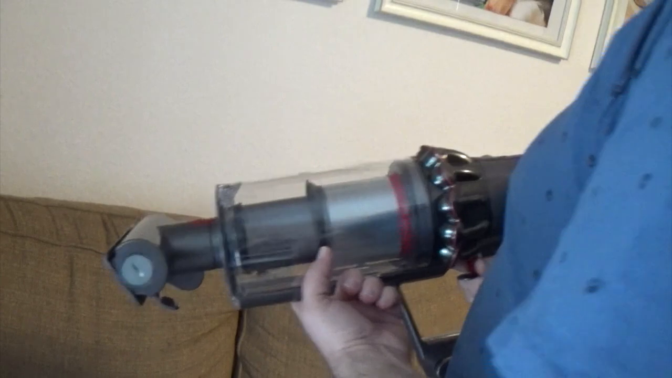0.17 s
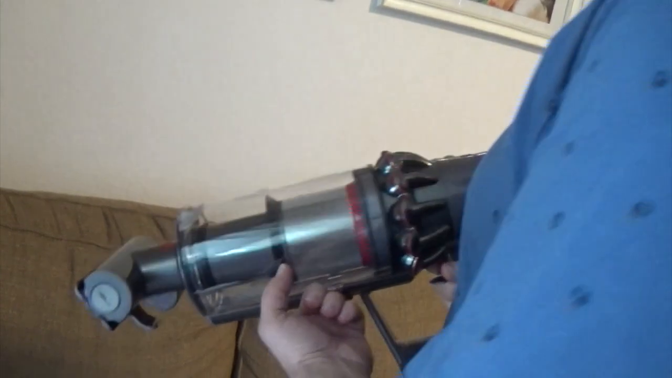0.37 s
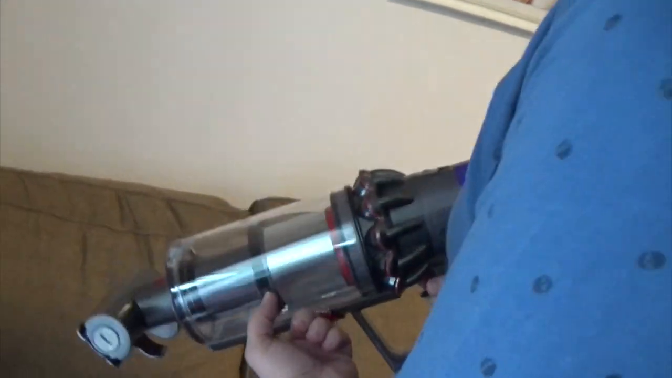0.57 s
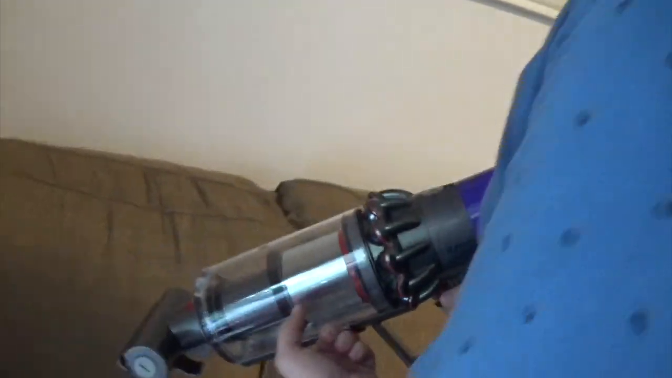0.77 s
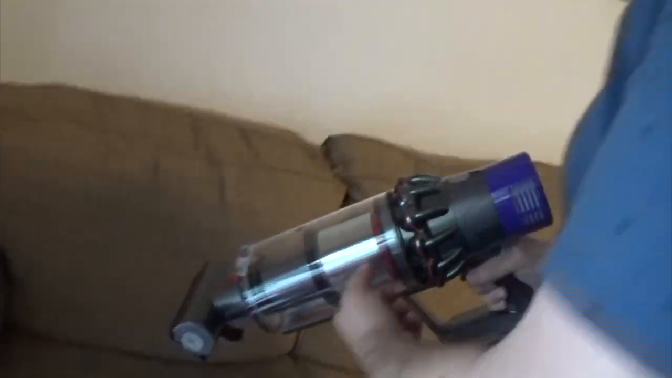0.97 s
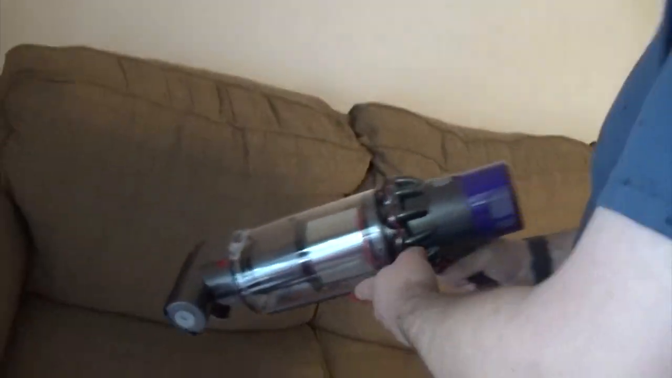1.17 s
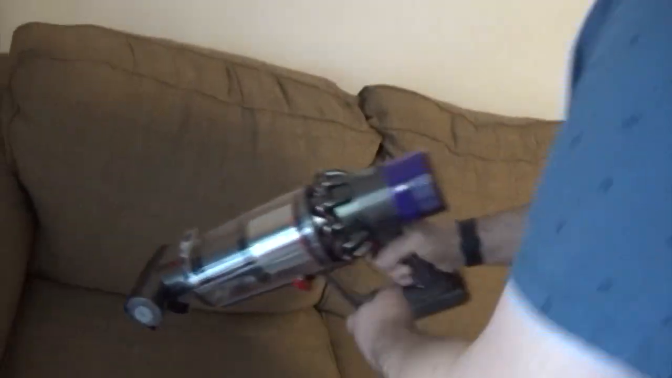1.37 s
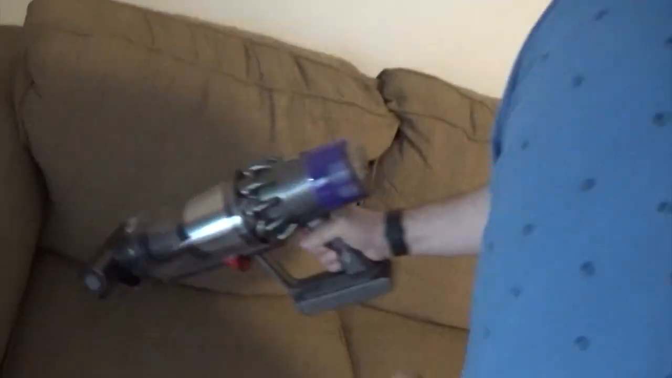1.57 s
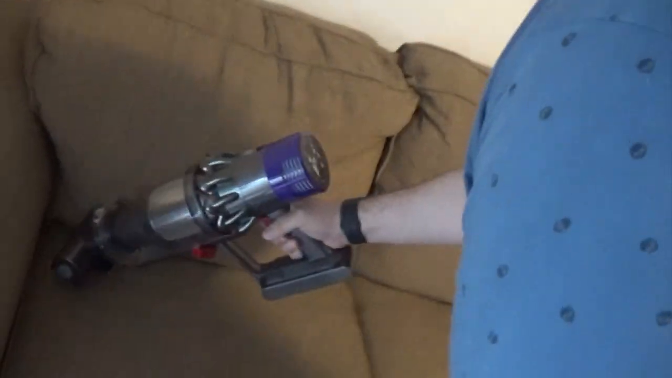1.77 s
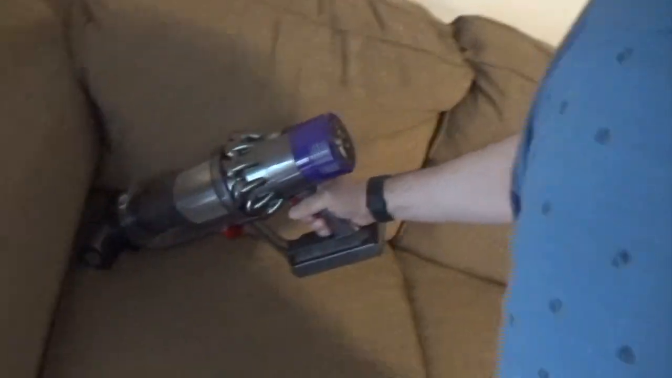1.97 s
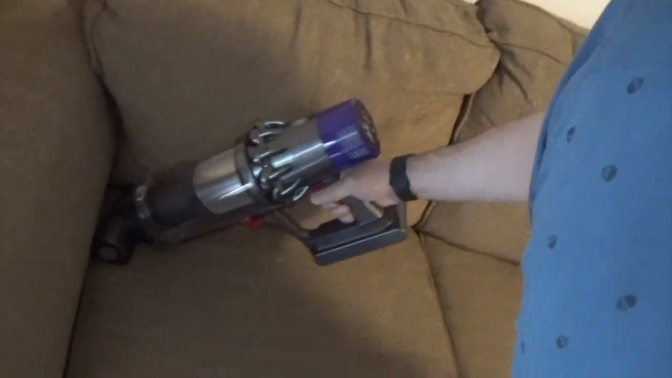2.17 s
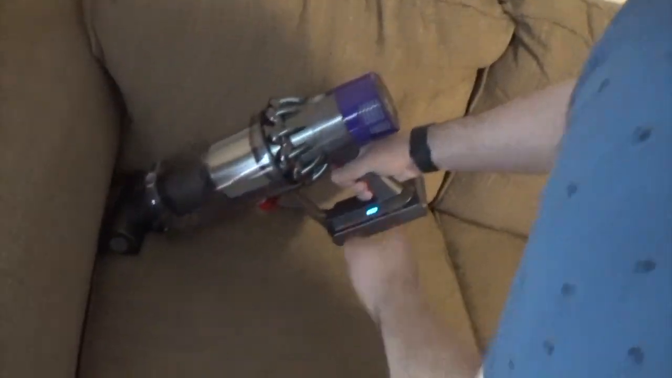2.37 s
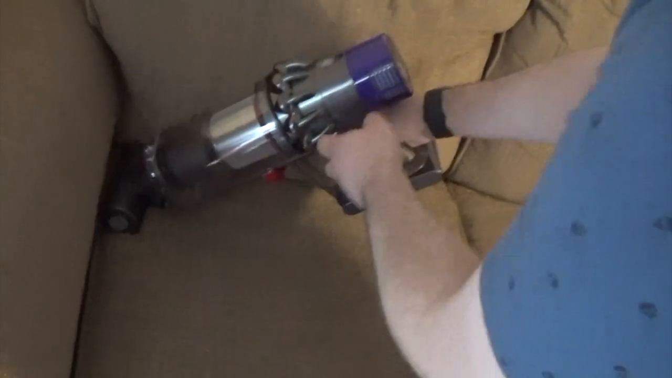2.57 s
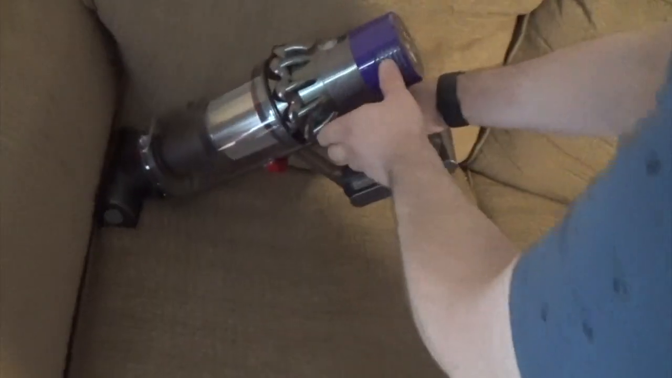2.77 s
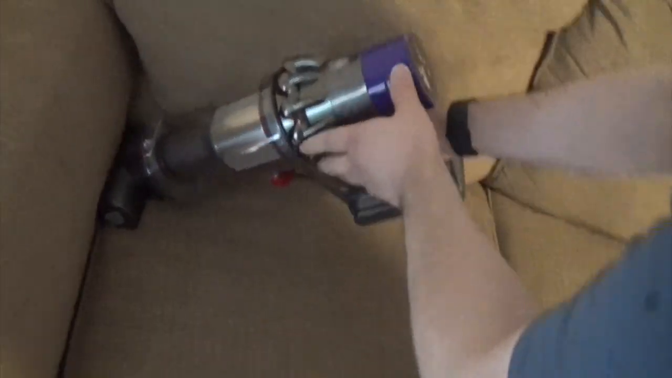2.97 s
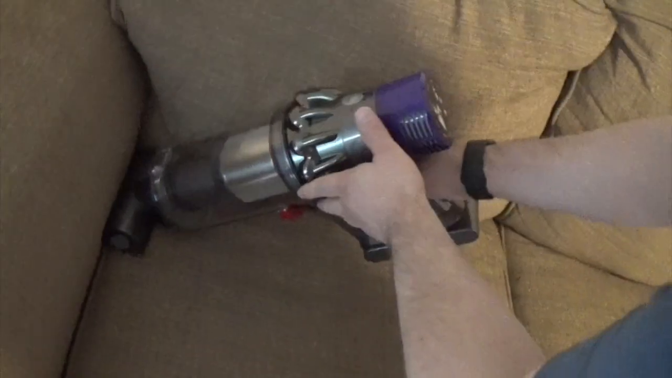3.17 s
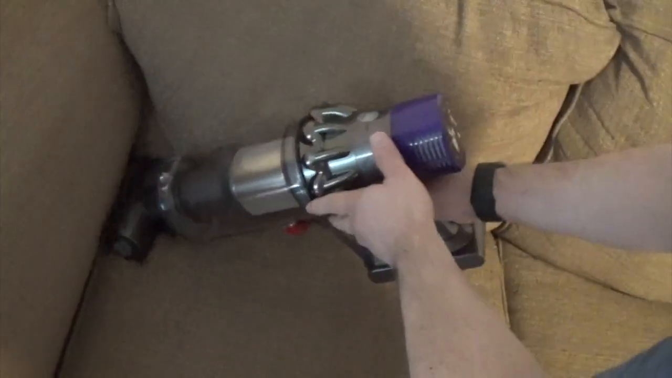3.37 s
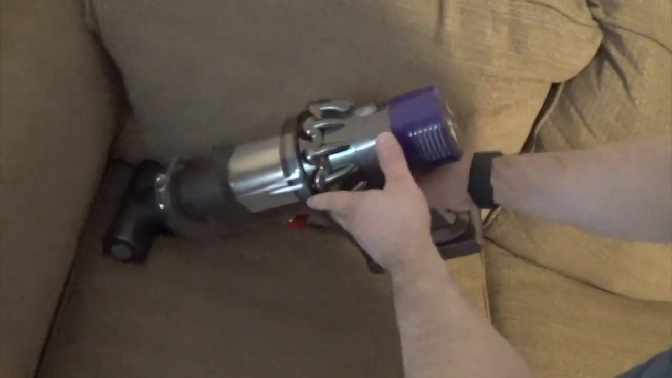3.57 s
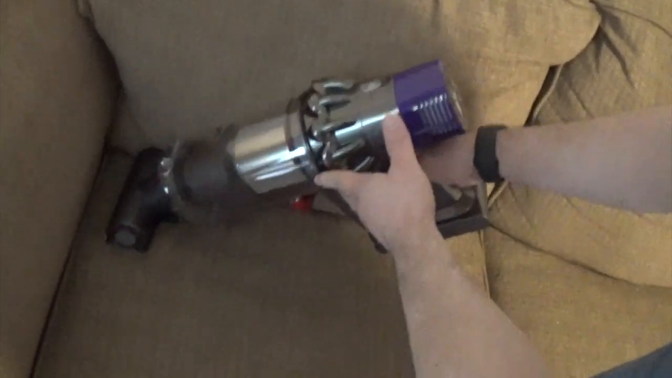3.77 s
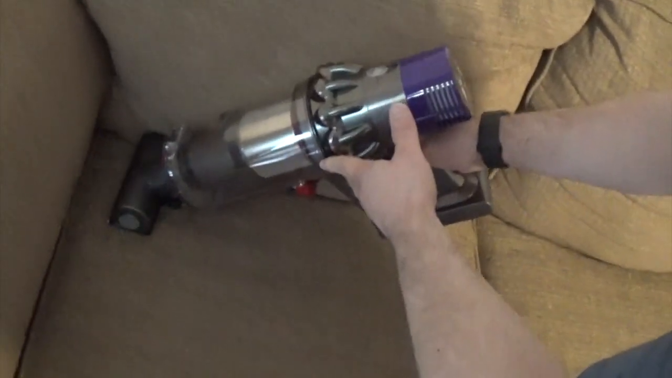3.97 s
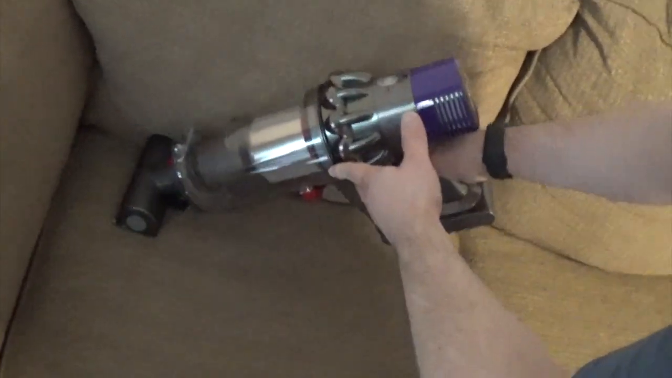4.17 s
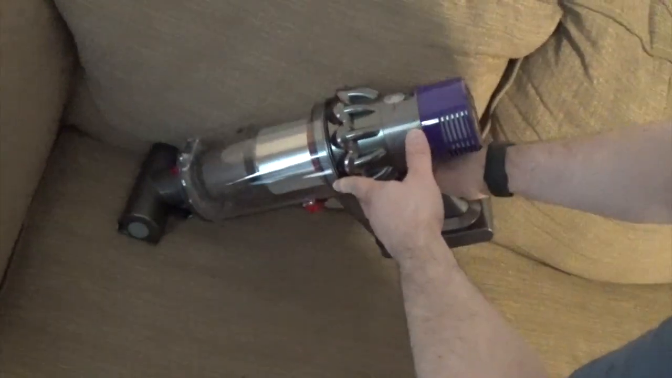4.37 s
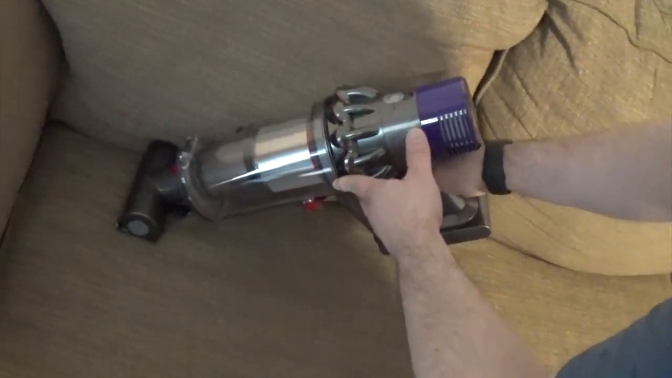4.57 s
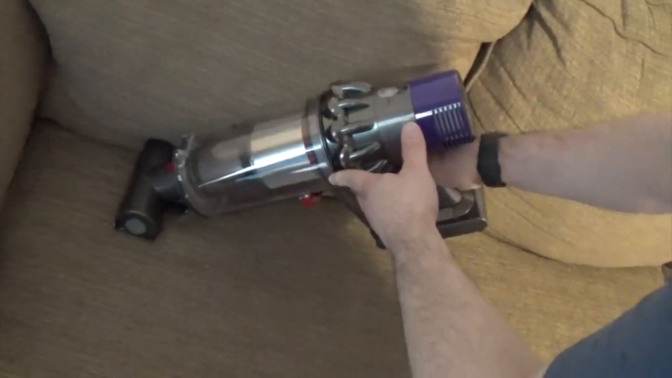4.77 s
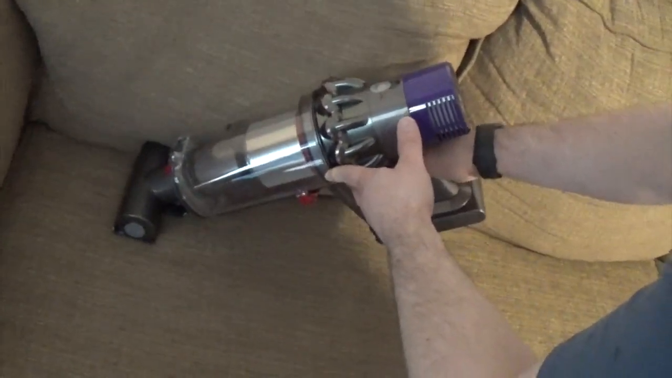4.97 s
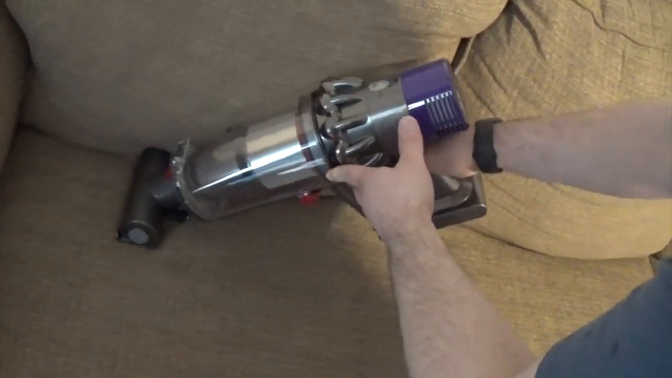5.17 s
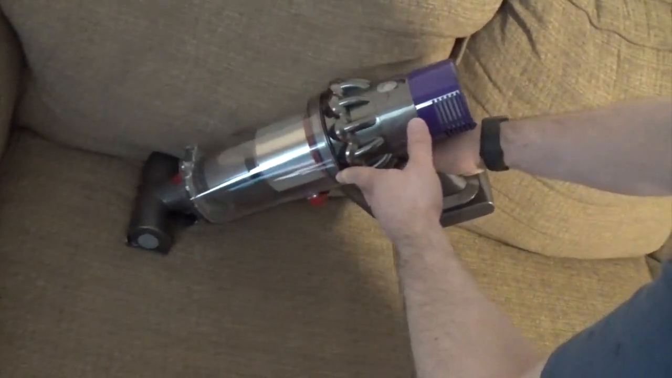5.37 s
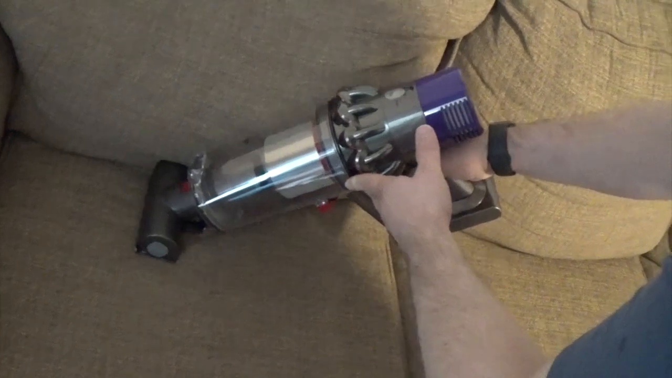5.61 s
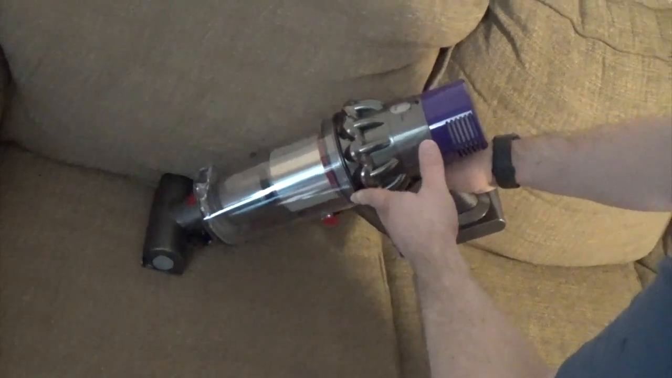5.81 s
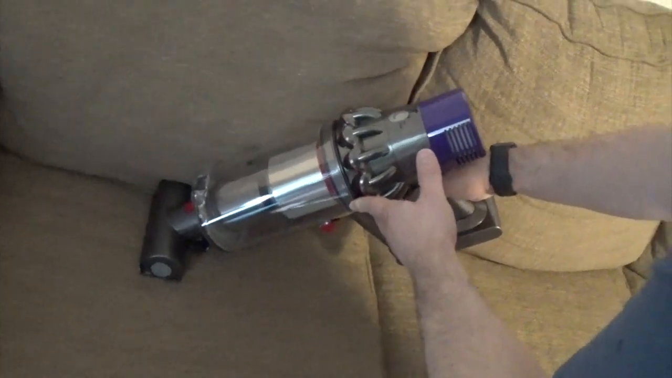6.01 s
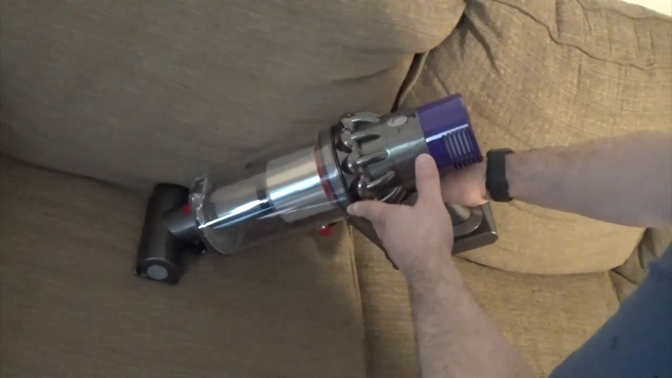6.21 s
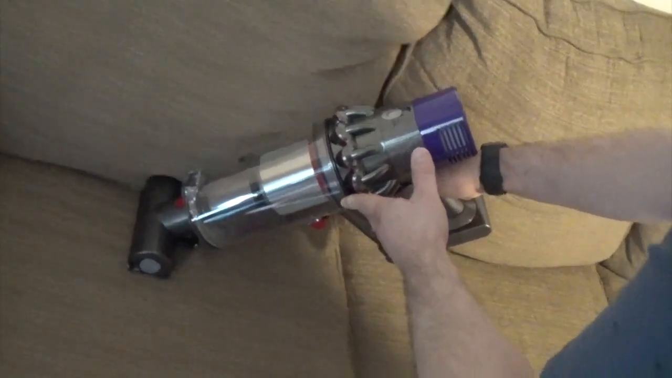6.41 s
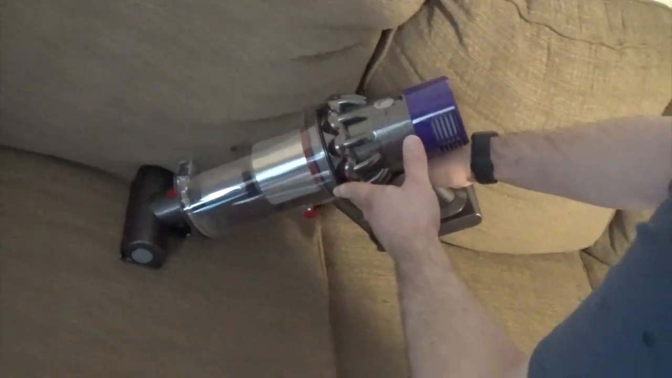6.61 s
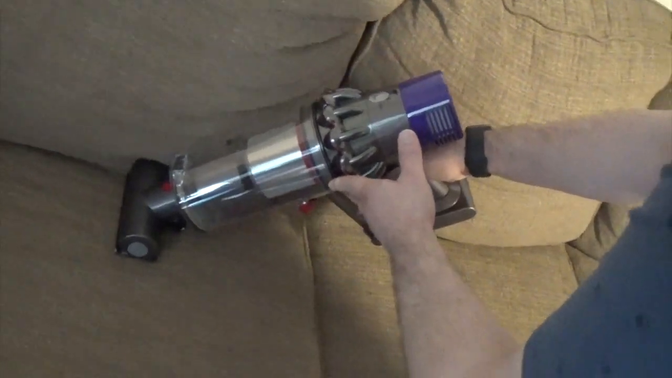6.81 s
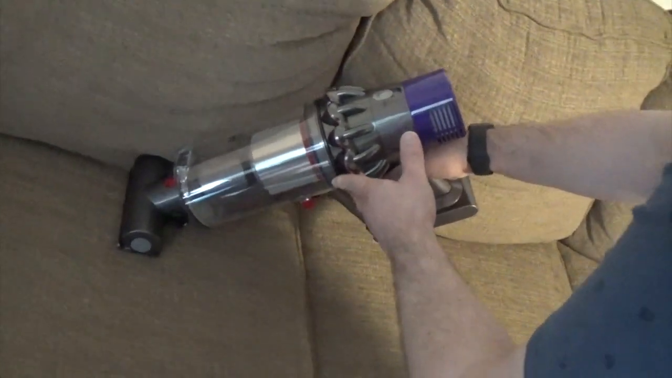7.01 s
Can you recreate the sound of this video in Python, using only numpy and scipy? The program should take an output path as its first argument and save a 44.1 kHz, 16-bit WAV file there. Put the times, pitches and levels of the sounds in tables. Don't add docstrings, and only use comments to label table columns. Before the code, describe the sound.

Quiet handling clicks, a brief motor chirp coasting down to silence, then a handheld vacuum starts abruptly and runs loudly with rushing air and high whine.

```python
import sys
import numpy as np
from scipy import signal
from scipy.fft import rfft, irfft, next_fast_len
from scipy.io import wavfile
from scipy.ndimage import uniform_filter1d, map_coordinates

SR = 44100
rng = np.random.default_rng(int(sys.argv[2]) if len(sys.argv) > 2 else 0)


def put_to_file(sound):
    columns = np.atleast_2d(sound).T
    safe = np.clip(columns, -1, 1)
    whole_steps = np.round(safe * 32767)
    wavfile.write(sys.argv[1], SR, whole_steps.astype(np.int16))


def decibels_to_gain(level_db):
    exponent = np.asarray(level_db, float) / 20
    return 10 ** exponent


N = 310905

# [f/Hz, width/Hz, level/dB]
CASING = [(290.4, 33, -13.5), (446.6, 47, -6), (618, 43, -7.5), (690, 24, -4), (840, 47, 2),
          (1010, 30, -27), (1097.5, 45, 14), (1190, 20, 4), (1305, 40, 7), (1476, 44.5, -1.5),
          (1750, 120, -9), (2035, 57, 0), (2215, 68, 2), (2310, 51, -2), (2420, 53, 4.5), (2700, 39, -20),
          (3024, 60, -6), (3355, 300, 0), (3873, 170, 0)]
# [t/s, shaft f/Hz, cogging level/dB, blade level/dB]
RUN_UP = [(2.496, 60, -60, -80), (2.503, 141, -41.5, -48), (2.511, 290, -33, -36), (2.52, 391, -46, -39),
          (2.53, 512, -37, -31), (2.537, 687, -23, -30), (2.553, 1014, -50, -24), (2.56, 1105, -55, -19),
          (2.569, 1215, -62, -34), (2.58, 1353, -70, -29), (2.597, 1555, -80, -21)]
# [t/s, stator whistle as the nozzle seals/dB, shading of the motor by hands/dB,
# blade beam/dB, left-right/dB]
POSE = [(2.62, -40, 3, -27, -1.8), (2.84, -42, -2, -33, -1.6), (3.0, -37, 0, -43, -1),
        (3.27, -46, -1, -35, -2.4), (3.46, -30, -1, -36, -2.3), (3.7, -36, -2, -30, -2.2),
        (3.8, -26.5, -6, -43, -2.1), (4.05, -26, -8, -37, -2.1), (4.31, -28, -8, -35, -2.5),
        (4.5, -26, -11, -48, -2.5), (5., -28, -8, -39, -2.5), (5.16, -26.5, -5, -31, -2.5),
        (5.5, -24, -1, -43, -2.9), (5.84, -23, 0, -35, -3), (6.35, -23.5, 0, -43, -2.9),
        (6.86, -23.5, 2, -46, -2.5), (7.05, -23, 2, -39, -2.5)]
# [f/Hz, side below mid/dB]
WIDE_RUN = [(60, -13), (130, -30), (290, -30), (640, -15.5), (1410, -22), (3100, -24), (6820, -27),
            (15000, -27)]
WIDE_QUIET = [(60, -10), (150, -25), (380, -12), (950, -11), (2380, -8.5), (5980, -15), (15000, -28)]
TOUCH_S, BACK_END_S = .4285, 2.49
PATCHY_DB = 1.6


def unit(x):
    return x / np.sqrt(np.mean(x ** 2) + 1e-20)


def along(points, hz):
    f, v = np.transpose(points)
    return np.interp(np.log(hz + 1), np.log(f + 1), v)


def span(start_s, end_s):
    t = np.arange(N) / SR
    return uniform_filter1d(1. * (t > start_s) * (t <= end_s), size=200)


def curves(rows):
    s, *columns = np.transpose(rows)
    t = np.arange(N) / SR
    return [np.interp(t, s, column) for column in columns] + [span(s[0], s[-1])]


def wobble(rate):
    coarse = np.arange(0, N + 16, 16)
    knots = rng.standard_normal(int(N * rate / SR) + 4)
    return np.interp(np.arange(N), coarse, map_coordinates(knots, [coarse * rate / SR]))


def filtered(x, response):
    m = next_fast_len(N + SR // 2)
    return irfft(rfft(x, m) * response(np.fft.rfftfreq(m, 1 / SR)), m)[..., :N]


def resonances(modes, f):
    return sum(decibels_to_gain(db) * 1j * f * w / (c * c - f * f + 1j * f * w) for c, w, db in modes)


def tone(hz, db, unsteady_db, rate=18):
    phase = 2 * np.pi * (np.cumsum(hz) / SR + rng.random())
    return np.sqrt(2) * decibels_to_gain(db + unsteady_db * wobble(rate)) * np.sin(phase)


def rush(gain, patchy_db, wide, streak_db=0.):
    z = signal.stft(rng.standard_normal((2, N)), nperseg=512)[2]
    a, b = rng.standard_normal((2, *z.shape[1:]))
    patches = uniform_filter1d(uniform_filter1d(a, size=8, axis=0), size=6, axis=1)
    streaks = uniform_filter1d(b, size=130, axis=1)
    uneven = z * decibels_to_gain(patchy_db * unit(patches) + streak_db * unit(streaks))
    pair = signal.istft(uneven, nperseg=512)[1][:, :N]
    mid, side = filtered(pair, lambda hz: gain(hz) * [np.ones_like(hz), decibels_to_gain(along(wide, hz))])
    return unit(np.array([mid + side, mid - side]))


def shaft():
    # [t/s, shaft f/Hz]
    governor = [(2.6, 1699), (3.45, 1699.2), (3.75, 1703), (4.35, 1702.5), (5.4, 1703.9), (7.05, 1704.2)]
    settle_s = .075
    t = np.arange(N) / SR
    end_s, end_hz, *_ = RUN_UP[-1]
    goal = curves(governor)[0]
    settling = goal - (goal - end_hz) * np.exp(-np.maximum(t - end_s, 0) / settle_s)
    return np.where(t < end_s, curves(RUN_UP)[0], settling)


def impeller():
    # [t/s, second, third, seventh multiple level/dB]
    facing = [(2.75, -50, -41, -48), (3.05, -35, -34, -49), (3.35, -36, -42, -43), (3.65, -39, -34, -41),
              (3.95, -50, -41, -44), (4.25, -39, -41, -48), (4.55, -47, -42, -44), (4.85, -49, -40, -45),
              (5.15, -44, -37, -43), (5.45, -43, -31, -52), (5.75, -39, -35, -52), (6.05, -37, -35, -53),
              (6.35, -35, -35, -53), (6.65, -34, -34, -50), (7.05, -35, -36, -56)]
    # [multiple of the shaft speed, level/dB]
    minor = [(4, -40.5), (6, -50.5)]
    hz = shaft() * (1 + .00005 * wobble(25))
    on = span(RUN_UP[0][0], N / SR)
    whistle_db, shade_db, *_ = curves(POSE)
    second_db, third_db, seventh_db, _ = curves(facing)
    slow_db = np.minimum(hz - 1690, 0) / 14
    levels = {1: -37 + .2 * shade_db, 2: second_db, 3: third_db, 5: whistle_db - .7, 7: seventh_db}
    levels = {k: db + slow_db for k, db in levels.items()}
    main = sum(tone(k * hz, db, 1.2, rate=10) for k, db in levels.items())
    main = main + unit(wobble(800)) * tone(5 * hz, levels[5] - 3.5, 2, rate=40)
    for k in (2, 3):
        main = main + unit(wobble(500)) * tone(k * hz, levels[k] - 9, 2, rate=30)

    blade_db, _ = curves([row[::3] for row in RUN_UP + POSE])
    blades = tone(9 * hz, blade_db + 1, 2 + 2.5 * (hz < 1620), rate=150)
    settled = np.clip(hz / 1700, 0, 1) ** 12
    weak = settled * sum(tone(round(k) * hz, db, 2.335) for k, db in minor)

    cogging_db, poles = curves(RUN_UP)[1], 8
    cogging = tone(poles * hz, cogging_db, 3.2, rate=250)
    start = on * (cogging + tone(2 * poles * hz, cogging_db - 6, 4, rate=250))
    shell = CASING + [(4100, 300, -4), (5380, 350, -3)]
    start = .3 * start + filtered(start, lambda f: resonances(shell, f))
    return start + on * (main + blades + weak)


def roar():
    # [f/Hz, level per Hz/dB]
    air_color = [(15, -81), (25, -40.5), (136, -39.5), (290, -20), (1000, -14.5), (1540, -12),
                 (1670, -11.5), (1910, -14), (3370, -10.5), (4410, -11), (5050, -8.5), (7770, -3.5),
                 (8650, 1), (9640, 0), (15600, -4)]
    # [f/Hz, width/Hz, level over the rush/dB]
    throat = [(643.5, 300, -6), (860.6, 38, -6.5), (1185, 23, -6.5), (1426, 20, -33), (2160, 270, -2.5),
              (2523, 26.7, -23), (3056, 1300, -3), (3790, 160, -5), (5020, 130, -9.5), (8540, 1300, -33.5)]
    # [t/s, hollow intake level/dB, duct level/dB, vent level/dB]
    nozzle = [(2.6, -5, 2, -6), (3.05, 0, 1, -6), (3.4, -3, 1, -4), (3.65, -8, -.5, -3),
              (3.95, -5, -1.5, -9), (4.25, -9, -1, -14), (4.55, -4, .5, -12), (4.9, -8, 1.5, -11),
              (5.2, -18, 1, -12), (5.6, -24, 0, -24), (6.2, -24, -.5, -24), (7.05, -24, 0, -20)]
    hollow, vent = (560, 420, 0), (11000, 1800, 0)  # (Hz, width Hz, dB)
    sealed_db, flowing_hz = -28, 900
    pressed_s, pressing_s = 3.2, .08
    hz, t = shaft(), np.arange(N) / SR
    on = span(RUN_UP[0][0] - .006, N / SR)
    leak_db = sealed_db - uniform_filter1d(curves(POSE)[0], size=SR // 8)
    flow_db = 40 * np.log10(np.clip(hz / flowing_hz, .2, 1))
    lag_db = 20 * np.log10(np.clip(hz / hz.max(), .4, 1))
    rush_db = -21.3 - .06 * leak_db + flow_db
    rumble_db = -16.2 + .08 * leak_db + lag_db - .6 * flow_db
    duct_db = -9.5 + 2.6 / (1 + np.exp((t - pressed_s) / pressing_s))
    hiss_db = -7.6 + .45 * leak_db + lag_db

    def color(f):
        return decibels_to_gain(along(air_color, f)) * np.abs(1 + resonances(throat, f))

    air = rush(color, 0.52, WIDE_RUN, streak_db=1.7)
    below = [filtered(air, lambda f: 1 / (1 + (f / edge_hz) ** 6)) for edge_hz in (1700, 4700, 9300)]
    hollow_air, vent_air = [filtered(air, lambda f: resonances([mode], f) ** 2) for mode in (hollow, vent)]
    hollow_db, gap_db, vent_db, _ = curves(nozzle)
    layers = [
        (rumble_db + .5, below[0]),
        (duct_db + gap_db + .6 * lag_db, below[1] - below[0]),
        (.3, below[2] - below[1]),
        (hiss_db + .1, air - below[2]),
        (rumble_db + hollow_db - 8.5, hollow_air),
        (hiss_db + vent_db - 7, vent_air)]
    gust_db = 0.19 * wobble(11) + 0.3 * wobble(400)
    return on * decibels_to_gain(rush_db + gust_db) * sum(decibels_to_gain(db) * unit(layer) for db, layer in layers)


def leaning(x):
    # [t/s, bin, motor, exhaust left-right/dB]
    sides = [(2.6, -1.0, 0.0, -0.5), (2.64, -2.0, -0.5, 0.0), (3.37, -1.5, -0.5, -1.5),
             (3.43, -1.5, -1.5, -2.5), (3.74, -1.5, -1.0, -1.0), (4.17, -0.5, -2.5, -2.0),
             (4.27, -1.5, -2.0, -2.5), (5.07, -2.0, -1.5, -2.0), (5.28, -2.0, -1.0, -0.5),
             (5.33, -1.5, -1.0, -2.0), (5.93, -2.5, -2.5, -2.5), (6.48, -2.5, -1.5, -1.5),
             (6.58, -1.5, -1.5, 0.0), (6.85, -3.0, -1.5, -0.5), (7.05, -2.5, -1.0, 0.0)]
    edges_hz = 900, 2500, 6500, 9500
    above = [filtered(x, lambda f: 1 / (1 + (edge_hz / (f + 1)) ** 8)) for edge_hz in edges_hz] + [0]
    sides_db = [.35 * curves(POSE)[3]] + [1.12 * db for db in curves(sides)[:3]]
    bands = [low - high for low, high in zip(above, above[1:])]
    return sum(np.tanh(db * np.log(10) / 40) * band for db, band in zip(sides_db, bands))


def brush():
    # [t/s, f/Hz, level/dB, extra on the second multiple/dB]
    load = [(2.6, 60, -31.5, 0), (2.78, 72, -14, 4), (2.85, 72.5, -6, 8), (2.91, 69, -14, 4),
            (2.98, 66, -6, 8), (3.05, 78, -10, -4), (3.12, 85, -3, -6), (3.22, 89, -2, -6),
            (3.37, 97, -3, -8), (3.46, 96, -12, -4), (3.6, 92.5, -3, -8), (3.8, 91.5, -4, -4),
            (3.92, 94, -9, 0), (4.1, 98.5, -4, -1), (4.3, 99.5, -2, -8), (4.42, 99.6, 0, 0),
            (4.9, 101, 4.5, 0), (5.3, 99.44, 1.5, 0), (5.8, 100.5, 1.5, 0), (7.05, 100, 4.5, 0)]
    # [multiple of the brush speed, level/dB]
    hum = [(1, -83), (2, -63), (3, -58), (4, -60), (5, -60.5), (18, -49.5)]
    hz, load_db, second_db, on = curves(load)
    return on * sum(tone(round(k) * hz, load_db + db + second_db * (round(k) == 2), 1.2) for k, db in hum)


def coasting():
    kick_hz_per_s = 134500
    drag_hz, drag_per_s, rest_s, bearing_hz = 1684.4, .819, 1.8843, 31.5
    t = np.arange(N) / SR
    braking = drag_hz * np.tan(np.clip(drag_per_s * (rest_s - t), 0, 1.3)) - bearing_hz
    return np.clip(np.minimum(kick_hz_per_s * (t - TOUCH_S), braking), 1, None)


def blip():
    # [t/s, drive level/dB]
    drive = [(.43, -50), (.446, -28), (.46, -36), (.56, -37), (.63, -25), (1.04, -31.5), (1.13, -40),
             (1.52, -31), (1.7, -52)]
    # [t/s, length/s, share]
    nulls = [(.487, .006, .7), (.556, .006, .7), (.576, .005, .7), (.606, .005, .7), (.652, .004, .6),
             (.713, .004, .85), (.735, .004, .85), (.775, .008, .5), (.832, .008, .6), (.932, .006, .6),
             (1.02, .004, .8), (1.11, .004, .7), (1.197, .004, .7), (1.232, .005, .7), (1.338, .004, .6),
             (1.43, .006, .5)]
    # [t/s, length/s, strongest multiple, level/dB, loss beside it/dB]
    rattles = [
        (.71, .045, 2.4, -35, 6),
        (.87, .15, 2, -50, 9),
        (1.165, .015, 3, -47, 0),
        (1.288, .013, 4, -49, 2),
        (1.43, .055, 2.8, -49, 11),
        (1.522, .011, 3, -38, 14),
        (1.558, .026, 3, -36, 14),
    ]
    hz, t = coasting(), np.arange(N) / SR
    drive_db, on = curves(drive)
    cogging = on * tone(hz, drive_db, .8 + 1.2 * (hz > 2700), rate=90)
    cogging = filtered(cogging, lambda f: resonances(CASING, f))
    for s, length, share in nulls:
        cogging = cogging * (1 - min(share, 1) * np.exp(-((t - s) / length) ** 2))
    kick = span(TOUCH_S + .012, TOUCH_S + .032) * tone(hz, -44, 3, rate=300)

    overtones = 0
    shapes = [np.exp(-((t - s) / length) ** 4) for s, length, *_ in rattles]
    for k in np.arange(8) + 2:
        strength = decibels_to_gain(-63 - 6 * (k - 2))
        for shape, (*_, top, db, loss_db) in zip(shapes, rattles):
            strength = strength + decibels_to_gain(db - loss_db * np.sqrt(abs(k - top))) * shape
        dulled = strength / (1 + (k * hz / 5000) ** 9)
        overtones = overtones + dulled * tone(k * hz, 0, 1.5 + .45 * k, rate=70)

    blades = tone(hz * 9 / 8, -70 + 57 * np.log10(hz / 1000), 3, rate=100)
    shaking = tone(hz / 8, -57 - 60 * (hz < 2280), 1.5)
    turn_s, top_hz, rise_s, heard_s = 1.618, 159, .17, 1.725
    back_hz = top_hz * (1 - np.exp(-np.maximum(t - turn_s, 0) / rise_s))
    third = tone(3 * back_hz, -61 - 31 * np.maximum(t - heard_s, 0), 2.5)
    back = span(heard_s, BACK_END_S) * (tone(back_hz, -67.5, 0.633) + third)
    spinning = span(TOUCH_S + .03, drive[-1][0]) * (overtones + blades)
    return cogging + kick + spinning + on * shaking + back


def blip_air():
    # [f/Hz, level per Hz/dB]
    jet_color = [(88, -68), (150, -38.5), (388, -14), (481, -14.5), (812, -11.5), (1800, -15.5),
                 (3040, -9.5), (4390, -10), (6470, -5), (15500, -65)]
    draught_color = [(88, -57), (150, -34.5), (373, -5.5), (574, -3), (735, -1), (1890, -3.5), (2200, -0.5),
                     (2610, -10), (6000, -17), (7800, -61), (13200, -120)]
    # [t/s, level/dB]
    backflow = [(.44, -80), (.75, -68), (.85, -58), (1.3, -50), (2.12, -52), (2.22, -57), (2.5, -58)]
    least_hz, attack_s = 500, .018
    hz, t = coasting(), np.arange(N) / SR
    fast = np.where(t < TOUCH_S + .03, 1, np.hypot(hz, least_hz) / hz.max())
    jet_db = -33 + 40 * np.log10(fast) - 40 * np.clip(1 - (t - TOUCH_S) / attack_s, 0, 2)

    def jet_gain(f):
        return decibels_to_gain(along(jet_color, f)) * np.abs(1 + resonances([(5800, 160, -2)], f))

    def draught_gain(f):
        return decibels_to_gain(along(draught_color, f)) * np.abs(1 + resonances([(2230, 87, 1.5)], f))

    jet = span(TOUCH_S - .005, BACK_END_S) * decibels_to_gain(jet_db) * rush(jet_gain, PATCHY_DB, WIDE_RUN)
    draught_db, on = curves(backflow)
    return jet + on * decibels_to_gain(draught_db) * rush(draught_gain, 0.94, WIDE_QUIET)


def sliding():
    # [t/s, level/dB, time to rise 20 dB/s, time to fall 20 dB/s]
    swishes = [(0., -57.5, .01, .01), (.16, -57, .013, .015), (.23, -54, .01, .02), (.33, -56, .045, .02),
               (.47, -40, .05, .4), (.72, -46, .15, .25), (1.08, -33, .025, .043), (1.34, -49.5, .23, .27),
               (1.54, -56, .1, .12), (1.66, -57, .1, .05), (1.93, -55, .035, .07), (2.01, -47.5, .09, .44),
               (2.26, -51, .1, .13), (2.355, -41.5, .13, .07), (2.5, -48.5, .18, .01)]
    # [f/Hz, level per Hz/dB]
    cloth = [(590, -33), (1000, -7.5), (1600, -4), (1740, -8.5), (4360, -7), (4950, -9.5), (5750, -7),
             (8700, 2.5), (15600, -19.5)]
    t = np.arange(3 * SR) / SR
    loudest_db = np.full(len(t), -71.)
    for s, db, rise, fall in swishes:
        ago = t - s
        loudest_db = np.maximum(loudest_db, db - 20 * np.where(ago < 0, -ago / rise, ago / fall))
    level = np.pad(decibels_to_gain(loudest_db), (0, N - len(t)))
    grain = decibels_to_gain(1.6 * wobble(600))
    return level * decibels_to_gain(1.5) * unit(grain * rush(lambda f: decibels_to_gain(along(cloth, f)), PATCHY_DB, WIDE_QUIET))


def tapping():
    # [t/s, peak level/dB, ring f/Hz, thud level/dB, crack level/dB]
    taps = [(0.157, -51, 8720, -16, -4), (0.186, -44.5, 1540, 0, -4), (0.2279, -40.5, 3650, -25, -0.5),
            (0.2346, -39.5, 6030, -22, -5), (0.3107, -37, 5950, -21, -9), (0.3294, -50.5, 1270, -21, -7.5),
            (0.414, -30.5, 1840, -17, -14), (0.4276, -42, 9000, -35, -2), (0.444, -24, 2445, -15, -12),
            (1.3473, -23.5, 560, 1, -6.5), (2.353, -26.5, 6500, -30, -2), (2.3944, -38, 1390, -1, -6),
            (2.4197, -36, 1733, -11, -10)]
    bumps = [
        (.768, -40, 900, 2, -14),
        (1.105, -46, 900, 2, -16),
        (1.02, -50, 3000, -20, -4),
    ]
    out, t = np.zeros(N + SR), np.arange(SR // 20) / SR
    for s, peak_db, hz, thud_db, crack_db in taps + bumps:
        crack = decibels_to_gain(crack_db - 60 * t / 0.038) * rng.standard_normal(len(t))
        ring = 0.59 * decibels_to_gain(-60 * t / 0.019) * np.sin(2 * np.pi * hz * t)
        thud = decibels_to_gain(thud_db - 60 * t / 0.023) * np.sin(2 * np.pi * 520 * t) * (1 - np.exp(-t / 0.00061))
        out[round(s * SR):][:len(t)] += decibels_to_gain(peak_db) * (crack + ring + thud)

    def small_parts(f):
        return (1j * f / 330 / (1 + 1j * f / 330)) ** 2 / (1 + 1j * f / 9000) ** 2

    return filtered(out[:N], small_parts)


def echo(x):
    # [f/Hz, t/s]
    decay = [(200, 0.24), (2000, 0.19), (10000, 0.107)]
    hz, t, z = signal.stft(rng.standard_normal((2, SR // 2)), SR, nperseg=256)
    fading = (hz > 300)[:, None] * decibels_to_gain(-60 * t / along(decay, hz)[:, None])
    tail = signal.istft(z * fading, SR, nperseg=256)[1]
    delayed = np.pad(x, (250, 0))[None]
    return signal.fftconvolve(delayed, tail / np.linalg.norm(tail[0]), axes=1)[:, :N]


def quiet_room():
    # [f/Hz, level per Hz/dB]
    hush = [(15, -63), (25, -33), (306, -10.5), (511, -9.5), (1150, -5.5), (1280, -6), (1500, -10),
            (2720, -16), (3370, -9), (3860, -17), (8890, -17.5), (13300, -23), (15600, -22.5)]
    return decibels_to_gain(-59.5) * rush(lambda f: decibels_to_gain(along(hush, f)), PATCHY_DB, WIDE_QUIET)


def scene():
    motors = impeller() + brush()
    running = motors + roar()
    early = blip() + tapping()
    lean = leaning(running.mean(axis=0))
    near = early * decibels_to_gain([[-.55], [.55]]) + running + lean * [[1], [-1]]
    echoes = decibels_to_gain(-10.5) * echo(early) + decibels_to_gain(-24) * echo(motors)
    return near + echoes + sliding() + blip_air() + quiet_room()


def band_limit(x):
    return signal.sosfilt(signal.butter(12, 15800, fs=SR, output="sos"), x)


def record(dry):
    ceiling, top_hz = .85, 15730
    rounded = dry / (1 + np.abs(dry / ceiling) ** 4) ** .25
    mix = filtered(rounded, lambda f: 1 / (1 + (f / top_hz) ** 400))
    return band_limit(mix)


dry = scene()
out = record(dry)
put_to_file(out)
```